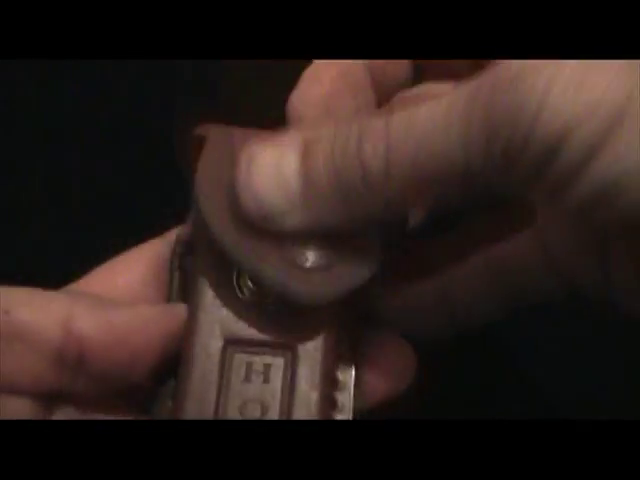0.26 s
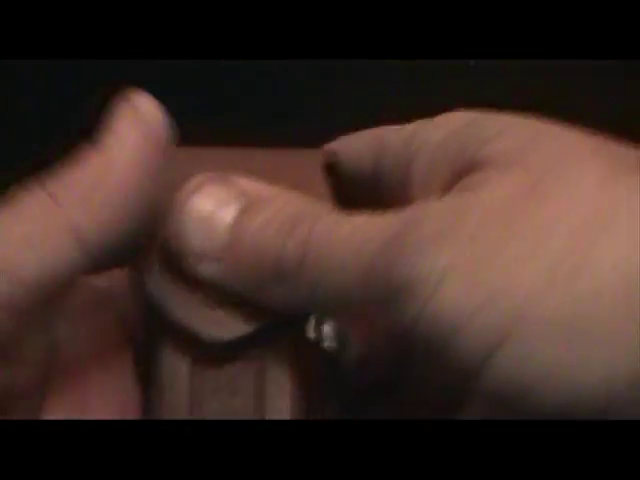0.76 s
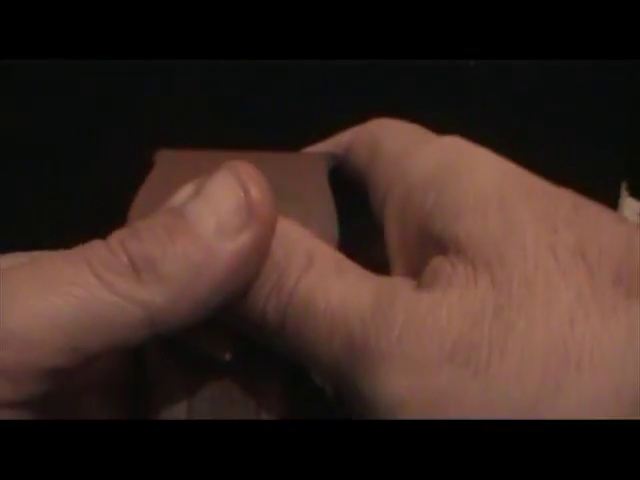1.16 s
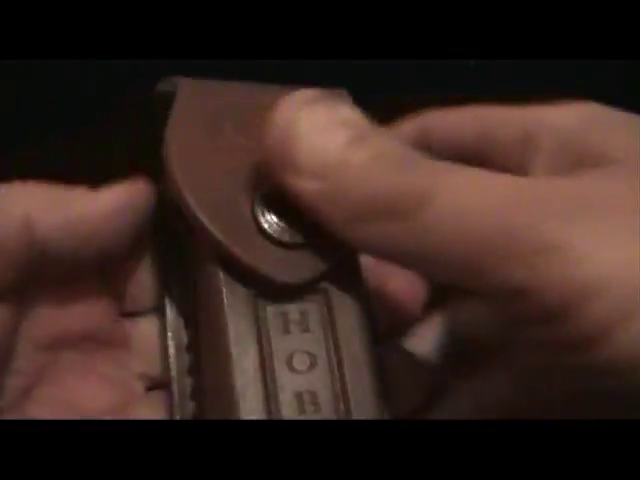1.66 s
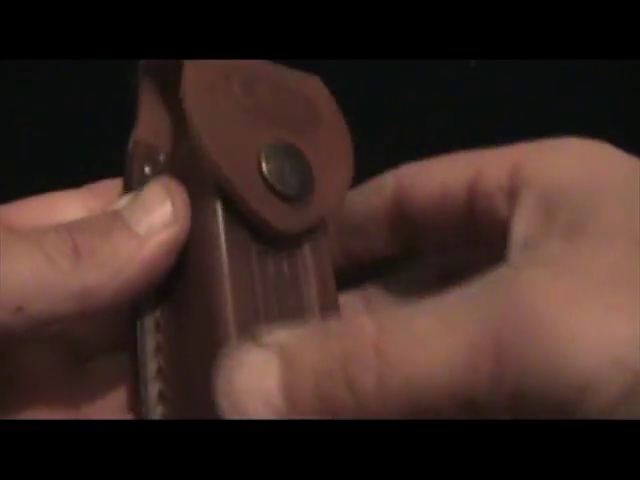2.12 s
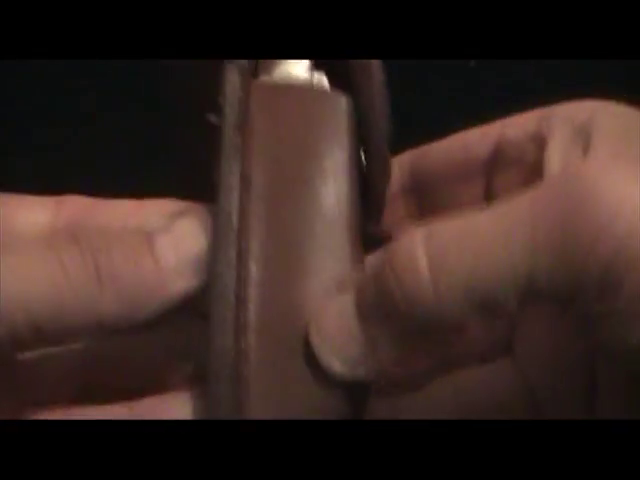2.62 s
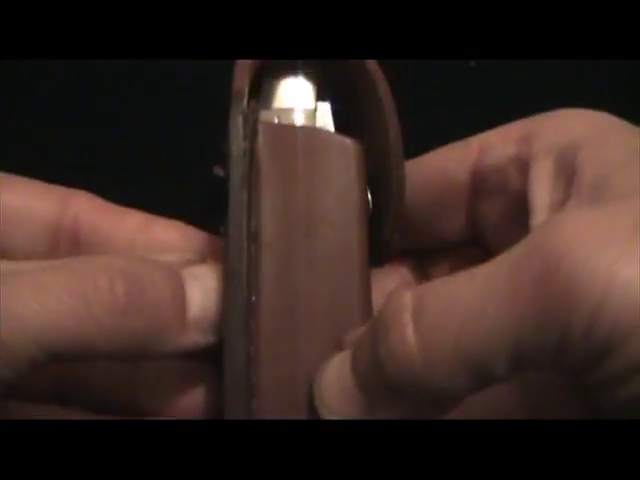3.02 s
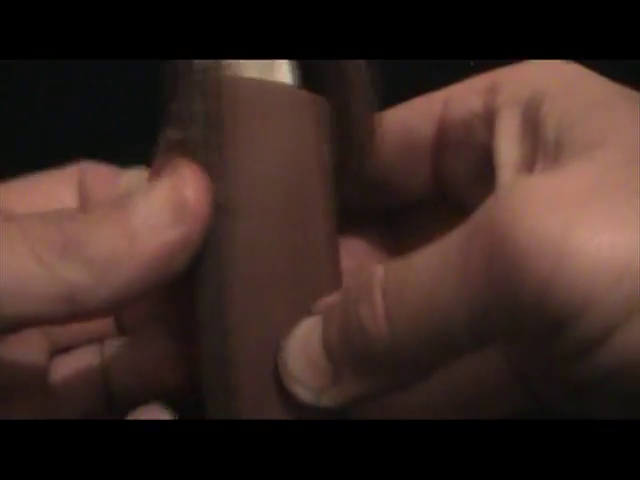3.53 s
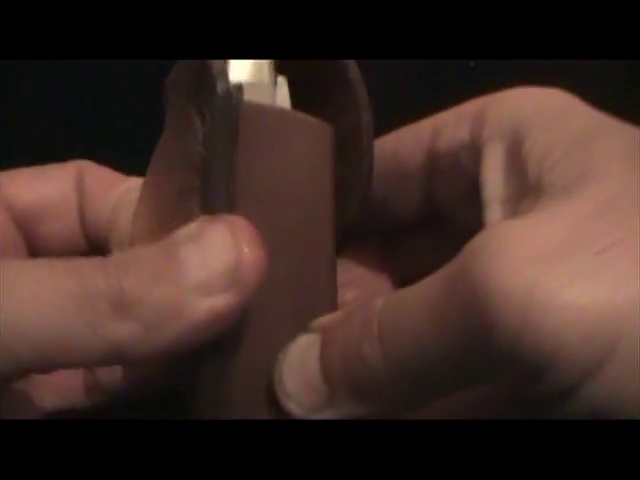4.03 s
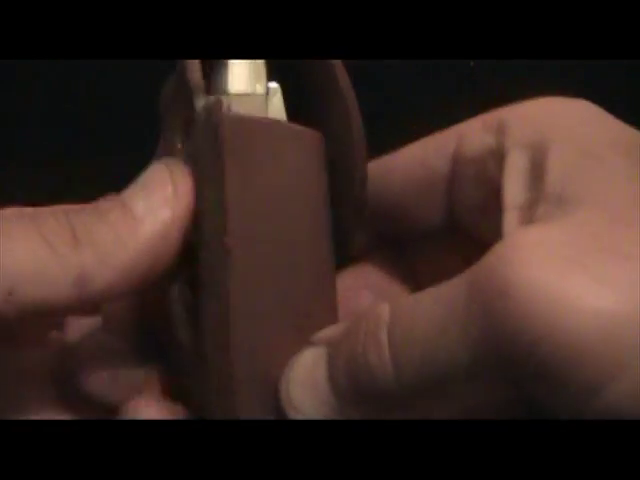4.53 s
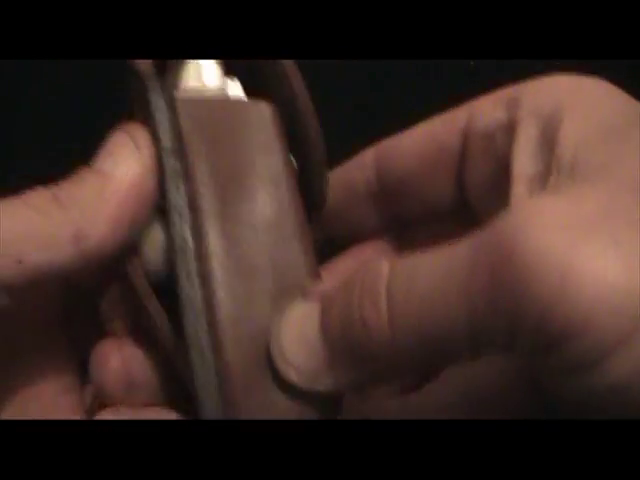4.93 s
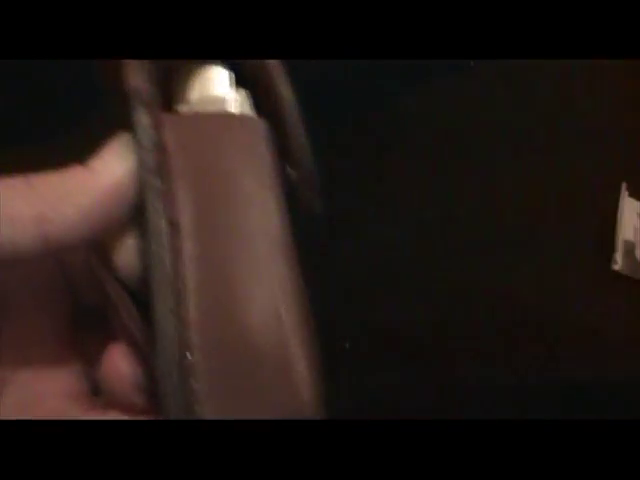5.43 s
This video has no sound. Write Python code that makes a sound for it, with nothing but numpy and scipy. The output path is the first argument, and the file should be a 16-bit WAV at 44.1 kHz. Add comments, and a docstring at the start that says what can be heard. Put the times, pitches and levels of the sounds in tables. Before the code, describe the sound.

Quiet, dry leather handling right at the microphones: light rustling and stud ticks, a short run of tight creaks, then a sudden overloaded snap just after one second. Afterwards come smooth rubbing strokes, scattered leather ticks and a dry crackle, growing busiest around four and a half seconds with muffled knocks, then fading into room tone, low hum and a thin high whine.

```python
"""Soft rubbing, clicks and creaks lead to the loud, overloaded snap of a press stud; then come strokes, ticks, knocks.
Hands fold the flap of a leather belt sheath over a steel utensil set, close to a camcorder in a quiet room.
Rubbing is dense random slips over filtered hiss; creaks, ticks, knocks and snap are damped sines with noise bursts.
A decaying-noise room echo, room tone, hum and whine surround them; soft clipping overloads the snap."""
import sys
import numpy as np
from scipy import signal
from scipy.fft import rfft, irfft
from scipy.io import wavfile
from scipy.ndimage import uniform_filter1d

SR = 44100
rng = np.random.default_rng(int(sys.argv[2]) if len(sys.argv) > 2 else 0)


def log_audio(samples):
    """Write samples as a 16-bit WAV file to the path given in sys.argv[1]."""
    # one column per channel
    frames = np.atleast_2d(samples).T
    # limit to full scale, then quantise
    limited = np.clip(frames, -1, 1)
    pcm = np.round(limited * 32767).astype(np.int16)
    wavfile.write(sys.argv[1], SR, pcm)


N = 249951

TIME = np.arange(N) / SR
AGE = TIME[:2048]  # time since the start of a short contact [s]
TOUCH_S = 0.008  # reference length of one contact [s]
BODY, RASP, HISS, THUMP = (600, 2800), (2800, 6500), (6500, 14500), (170, 600)  # ranges [Hz]
# colour of skin or steel sliding on leather: (frequency [Hz], level [dB])
SLIDE_COLOUR = [(60, -14), (200, -12), (500, -3.5), (800, -4.5), (1300, 5), (2100, 0), (2900, -9.5),
                (3900, -4), (4600, -5.5), (5400, -12.5), (6500, -14), (8500, -11.5), (11000, -27.5),
                (15000, -21)]


def undb(db):
    """Decibels to gain."""
    return 10 ** (np.asarray(db) / 20)


def level(x, db):
    """Set the rms level."""
    return x * undb(db) / np.sqrt(np.mean(x ** 2))


def touch_level(x, db):
    """Set the energy of a short sound, as its rms level over one brief contact."""
    return x * undb(db) / np.sqrt(np.sum(x ** 2) / (TOUCH_S * SR))


def band(x, edges, order=2):
    """Causal band-pass."""
    return signal.sosfilt(signal.butter(order, edges, "bandpass", fs=SR, output="sos"), x)


def colour(x, points):
    """Filter a sound by a curve through (frequency [Hz], level [dB]) points."""
    hz, db = np.transpose(points)
    f = np.maximum(np.fft.rfftfreq(len(x), 1 / SR), 1)
    curve_db = np.interp(np.log(f), np.log(np.maximum(hz, 1)), db)
    return irfft(rfft(x) * undb(curve_db), len(x))


def walk(rate):
    """Smooth random wander of rms 1, with a new target rate times a second."""
    hold = int(SR / rate)
    steps = np.repeat(rng.standard_normal(N // hold + 1), hold)
    return level(uniform_filter1d(steps, hold)[:N], 0)


def add(out, s, x):
    """Mix x in at time s."""
    i = int(s * SR)
    out[i:i + len(x)] += x[:N - i]


def fade(t60, t=AGE):
    """Exponential decay, 60 dB in t60 seconds."""
    return np.exp(-np.log(1000) * t / t60)


def ring(modes, t=AGE, length=1):
    """Damped modes of alternating sign, each building up as the blow spreads into the body."""
    out = 0
    for k, (hz, db, t60, rise) in enumerate(modes):
        envelope = fade(t60 * length, t) * (1 - np.exp(-t / rise))
        out = out + (-1) ** k * undb(db) * np.sin(2 * np.pi * hz * t) * envelope
    return out


def burst(edges, t60):
    """Crunch of a contact breaking up: band-passed noise with a quick rise and a short decay."""
    return band(rng.standard_normal(len(AGE)) * (fade(t60) - fade(t60 / 8)), edges, order=3)


def background(floor_db=-58, side_db=0, waver=0.2, flutter_db=2.5):
    """Steady room tone and recorder hiss, with a low hum and a thin, high whine whose pitch and level waver a
    little."""
    # room tone and hiss, common and opposed between channels: (frequency [Hz], relative level [dB])
    floor_mid = [(30, -14), (60, -9.5), (120, -0.5), (170, -3.5), (230, 3), (290, -3.5), (400, -7),
                 (700, -6.5), (1300, -9.5), (2500, -16), (4000, -17), (6000, -25), (8000, -26),
                 (14000, -32)]
    floor_side = [(30, -13), (60, -5), (130, -1.5), (200, -3), (400, -3.5), (700, -5.5), (1300, -9),
                  (2500, -13), (4000, -16), (8000, -25), (14000, -23)]
    # motor hum and line whine: (frequency [Hz], rms level [dB])
    hum_tones = [(213, -73), (1260, -80.5), (7865, -86), (15734, -72.5)]
    mid, side = (band(colour(rng.standard_normal(N), points), (20, 14300), order=8)
                 for points in (floor_mid, floor_side))
    hum = 0
    for hz, db in hum_tones:
        tone = np.sin(2 * np.pi * hz * TIME + waver * walk(25))
        hum = hum + level(tone * undb(flutter_db * walk(9.8)), db)
    opposed = level(side, floor_db + side_db) * np.array([[1], [-1]])
    return level(mid, floor_db) + hum + opposed


def turned(turn_s=2.68, turn_length_s=0.8):
    """Turning the sheath over in the hands, from 0 (flap under the fingers) to 1 (hollow wall)."""
    return np.clip((TIME - turn_s) / turn_length_s + 0.5, 0, 1)


def sliding(attack=0.27, release=0.44, grip_rasp_db=-9, grip_hiss_db=-16, grip_wander_db=0.5):
    """Sliding strength in the body, rasp and hiss ranges: strokes on top of the restless grip."""
    # finger strokes: (start [s], length [s], peak level [dB], rasp [dB re level], hiss [dB re level])
    strokes = [(0, 0.15, -68.5, 2.5, 0), (.178, .08, -57.5, 5, -11), (0.284, 0.064, -52, -1.5, -6.5),
               (0.323, 0.1, -53.5, -15, -12), (0.448, 0.035, -62, -22, -21), (0.576, .1, -66.5, 3, 3.5),
               (0.646, 0.079, -48.5, -10.5, -19), (0.777, 0.027, -50, -15, -14),
               (0.867, 0.078, -60, -12, -3), (1.05, 0.25, -58.5, -9, -18), (1.459, 0.082, -57, -6.5, 1),
               (1.534, 0.081, -58, -1.5, -5), (1.677, .09, -52, -9.5, -8), (1.858, 0.1, -48, -9, -8),
               (1.993, 0.1, -49.5, -10, -14.5), (2.094, 0.11, -53, -10, -14.5),
               (2.229, 0.037, -57.5, -9.5, -14), (2.36, 0.074, -57, -4, -6.5),
               (2.411, 0.084, -48, -10.5, -13.5), (2.462, 0.26, -51.5, -9, -15.5),
               (2.799, 0.05, -62, 1, -15.5), (2.891, 0.046, -47, -7.5, -19), (2.93, .07, -67, -3, -22),
               (3.016, 0.02, -59, 4.5, -1.5), (3.23, 0.16, -52.5, -4.5, -13.5),
               (3.367, 0.024, -46, -13, -28), (3.495, 0.096, -44.5, -3.5, -14),
               (3.534, 0.041, -41.5, -3, -4.5), (3.624, 0.13, -53, -4.5, -12),
               (3.753, 0.045, -53, -6, -6.5), (3.839, 0.099, -57, -7.5, -17.5),
               (3.959, 0.093, -57.5, -8.5, -16.5), (4.055, 0.079, -49.5, -6.5, -14),
               (4.238, 0.061, -45.5, -4.5, -18.5), (4.338, 0.05, -48.5, -8, -16.5),
               (4.393, 0.088, -42, -10.5, -14.5), (4.458, 0.037, -40.5, -11, -6.5),
               (4.54, 0.095, -52, -7, -11.5), (4.641, .05, -50, -12, -16), (4.694, 0.092, -54, -13, -18),
               (4.82, 0.1, -52.5, -15, -21), (5.059, 0.031, -52, -15, -9),
               (5.185, 0.054, -53.5, -3.5, -11.5), (5.585, 0.2, -63.5, 1, -5.5)]
    # the gripping hands keep shifting a little between strokes: (time [s], level [dB])
    grip_points = [(0, -69.5), (.55, -60), (1.0, -62.5), (1.4, -66), (2.3, -67.5), (2.75, -79), (3.2, -61),
                   (3.5, -60), (3.82, -63), (4.5, -62), (5.17, -63), (5.26, -75.5), (5.67, -73)]
    grip = undb(np.interp(TIME, *np.transpose(grip_points)) + grip_wander_db * walk(12))
    power = (undb([[0], [grip_rasp_db], [grip_hiss_db]]) * grip) ** 2
    for s, length, db, rasp, hiss in strokes:
        # a stroke gathers speed, glides and eases off; attack and release are shares of its length
        along = np.linspace(0, 1, int(length * SR))
        speed = np.clip(np.minimum(along / attack, (1 - along) / release), 0, 1)
        for part, part_db in zip(power, (0, rasp, hiss)):
            add(part, s, (undb(db + part_db) * speed) ** 2)
    return np.sqrt(power)


def rubbing(slide, grain_db=2.5, grains_per_s=1100, smooth_db=-5, stutter_db=2.0, hiss_grain_db=-9,
            body_db=-3, rasp_db=0, hiss_db=-1, sheen_db=-7):
    """Skin catches on the grain of the leather in dense tiny slips, over a smooth hiss that rules the treble."""
    sizes = undb(grain_db * np.minimum(rng.exponential(size=N), 4))
    hits = (rng.random(N) < grains_per_s / SR) * rng.choice([-1, 1], N)
    grains = level(hits * sizes * undb(stutter_db * walk(130)), 0)
    smooth = rng.standard_normal(N)
    gritty = colour(grains + undb(smooth_db) * smooth, SLIDE_COLOUR)
    silky = colour(undb(hiss_grain_db) * grains + smooth, SLIDE_COLOUR)
    parts = [(gritty, (60, BODY[1]), body_db), (gritty + silky, RASP, rasp_db), (silky, HISS, hiss_db)]
    friction = sum(gain * level(band(x, edges, order=4), db) for gain, (x, edges, db) in zip(slide, parts))

    def resonance(hz, width, db):
        """The same slips, with new random signs, ring the leather under the fingers."""
        return level(band(grains * rng.choice([-1, 1], N), (hz - width / 2, hz + width / 2)), db)

    flap = resonance(2300, 690, -7.5)
    wall = resonance(1310, 420, -3)
    # the polished flap adds a high sheen to the hiss
    sheen = level(band(smooth, (8500, 13800), order=6), sheen_db)
    over = turned()
    return friction + (1 - over) * (slide[0] * flap + slide[2] * sheen) + over * slide[0] * wall


def crackle(slide, per_s=50, gain_db=-2, wall_db=3, limit_db=-54, spread_db=3, hz=1350, t60=0.005, grit_db=-4):
    """Leather lets go in faint, dry random creaks that follow the pressure to a limit; the wall creaks most."""
    pressure = np.minimum(slide, undb(limit_db)) * undb(wall_db * turned())
    out = np.zeros(N)
    for when, size, place in rng.random((int(per_s * N / SR), 3)):
        pitch = hz * np.exp(0.3 * (place - 0.5))
        tone = touch_level(ring([(pitch, 0, t60, t60 / 10)]), 0)
        wall = tone + touch_level(burst(BODY, t60), grit_db)
        loudness_db = gain_db + spread_db * (2 * size - 1)
        add(out, when * TIME[-1], pressure[int(when * N)] * touch_level(wall, loudness_db))
    return out


def echo(x, wet_db=-22, gap_s=0.0064, build_s=0.011):
    """A small furnished room: the walls answer after a gap, the echoes thicken, and the top band dies first."""
    # bands of the echo: (centre [Hz], relative level [dB], t60 [s])
    room_bands = [(247.2, -7, .35), (494, -3.5, 0.21), (940, 4.5, 0.22), (2000, -3, .33), (3940, 0.5, .28),
                  (7870, -3.5, 0.2), (15000, -13, .14)]
    t = TIME[:SR // 2]
    tail = 0
    for hz, db, t60 in room_bands:
        edges = hz / np.sqrt(2), min(hz * np.sqrt(2), HISS[1])
        tail = tail + undb(db) * band(rng.standard_normal(len(t)), edges, order=3) * fade(t60, t)
    tail = tail * (1 - np.exp(-np.maximum(t - gap_s, 0) / build_s))
    return signal.fftconvolve(x, undb(wet_db) * tail / np.sqrt(np.sum(tail ** 2)))[:N]


def slips(rows, ring_t60, grit_db, grit_t60, edge_t60, edge_db, thump_hz, thump_t60):
    """Each slip rings the damped leather, plucks the stiff seam, tears at fibres and thumps the pocket.

    rows: (time [s], level [dB], ring [Hz], rasp [dB], hiss [dB], thump [dB re level]); rasp and hiss are re
    level before the edge_db trim."""
    # modes of the hollow pocket: (multiple of the thump pitch, relative level [dB])
    pocket_modes = [(1, 0), (1.5, -3), (2.1, -1)]
    out = np.zeros(N)
    for s, db, hz, rasp, hiss, low in rows:
        wall = touch_level(ring([(hz, 0, ring_t60, ring_t60 / 10)]), 0)
        body = touch_level(wall + touch_level(burst(BODY, grit_t60), grit_db), 0)
        seam = ring([(f * rng.uniform(0.97, 1.03), 0, edge_t60, edge_t60 / 10) for f in (3300, 5300)])
        edge = touch_level(touch_level(burst(RASP, edge_t60), 0) + touch_level(seam, 0), rasp)
        fibres = touch_level(burst((HISS[0], 11000), edge_t60), hiss)
        hollow = 0
        for k, (multiple, mode_db) in enumerate(pocket_modes):
            hollow = hollow + (-1) ** k * undb(mode_db) * np.sin(2 * np.pi * multiple * thump_hz * AGE)
        pocket = touch_level(band(hollow * fade(thump_t60), THUMP), low)
        add(out, s, undb(db) * (body + undb(edge_db) * (edge + fibres) + pocket))
    return out


def small_contacts(ring_t60=0.006, tick_hiss_db=-13.5, tick_thump_db=-18.5):
    """Ringing ticks, dry cracks and bright clicks all sound through the same leather body."""
    # light touches of the stud's cap: (time [s], level [dB])
    click_rows = [(0.3149, -45.5), (0.4018, -42.5), (.4152, -46.5), (.6615, -51), (1.472, -53)]
    # the squeezed leather, flap or wall, lets go with a short ring: (time [s], level [dB], ring [Hz], rasp [dB
    # before edge trim])
    tick_rows = [(.687, -47.5, 1160, -5), (.8, -52.5, 2360, -16), (.83, -48, 2280, -18),
                 (1.8435, -54, 1360, -2.5), (2.4541, -42, 1170, -20), (2.4602, -41, 1900, -5.5),
                 (2.652, -53.5, 1177, -7), (2.6892, -54.5, 2200, 6), (2.9066, -37.5, 1300, -16),
                 (2.9476, -47, 1774, -2), (3.333, -42, 1600, -20), (3.3376, -46.5, 1210, -10),
                 (3.371, -44.5, 1200, -3), (3.3806, -47, 1160, -4), (3.4478, -45.5, 1360, 4),
                 (3.5137, -45, 1160, 0.5), (3.6239, -38, 1325, -18), (3.92, -50.5, 1210, 1.5),
                 (3.9462, -44.5, 1220, -3), (3.9645, -47.5, 1230, 4), (4.064, -44.5, 1022, -19),
                 (4.2493, -43, 1180, -2.5), (4.2738, -35, 1350, -5.5), (4.3924, -46, 1230, -2.5),
                 (4.4144, -41.5, 2150, -9), (4.4711, -33.5, 1350, -23), (4.485, -36.5, 1280, -16),
                 (4.5155, -43, 1460, -5), (4.5494, -44, 1450, -6), (4.564, -40.5, 1510, -7.5),
                 (4.6038, -42, 1500, -25), (4.6224, -44, 1280, -7), (4.6565, -41.5, 1450, -6.5),
                 (4.6979, -45, 1050, -4), (4.9521, -46, 1530, -18), (4.9772, -46.5, 1350, -3.5),
                 (4.99, -46.5, 1350, -8), (5.0042, -50, 1270, -7), (5.078, -52, 1250, -7),
                 (5.087, -43, 1490, -8.5)]
    # stiff leather cracks drily as it bends, with a hollow thump: (time [s], level [dB])
    crack_rows = [(0.8947, -51), (.948, -50.5), (2.906, -48), (2.9964, -52), (3.0275, -51.5), (3.08, -49),
                  (3.1089, -49.5), (3.1265, -49), (3.1464, -41.5)]
    # added to each row: ring [Hz], then rasp, hiss and thump [dB]
    clicks = [(s, db, 1250, 4, 3, -7.5) for s, db in click_rows]
    cracks = [(s, db, 852, -2, -25, -0.5) for s, db in crack_rows]
    ticks = [(s, db, hz, rasp, rasp + tick_hiss_db, tick_thump_db) for s, db, hz, rasp in tick_rows]
    ringing = slips(ticks, ring_t60, grit_db=-7.5, grit_t60=0.0081, edge_t60=0.0066, edge_db=-5.5,
                    thump_hz=296.0, thump_t60=0.0059)
    dry = slips(cracks + clicks, ring_t60, grit_db=4, grit_t60=0.007, edge_t60=0.0055, edge_db=-4.5,
                thump_hz=250, thump_t60=0.007)
    return ringing + dry


def knocks():
    """Steel utensils knock dully in their pocket, each with a brief scrape that peaks just ahead of the knock."""
    # (time [s], level [dB], ring [Hz], rasp [dB before edge trim], hiss [dB before edge trim],
    #  thump [dB re level], thump [Hz], ring t60 [s], scrape [dB re level], scrape rise and fall constant [s])
    knock_rows = [(0.419, -35.5, 1180, -19, 1, -21, 240, 0.014, 0.5, 0.0025),
                  (4.3592, -24, 1340, -24, -30, -31, 268, 0.0097, -41, 0.0024),
                  (4.4407, -22.5, 1035, -42, -43, -7.5, 315, 0.01, -17, 0.0014),
                  (4.886, -27.5, 1370, -11, -8, -9.5, 250, 0.015, -3, 0.0036)]
    out = np.zeros(N)
    middle = AGE[-1] / 2
    for s, db, hz, rasp, hiss, low, pocket_hz, t60, scrape_db, length in knock_rows:
        out += slips([(s, db, hz, rasp, hiss, low)], ring_t60=t60, grit_db=-8, grit_t60=0.011,
                     edge_t60=0.007, edge_db=-4.5, thump_hz=pocket_hz, thump_t60=0.025)
        swell = np.exp(-np.abs(AGE - middle) / length)
        scrape = colour(rng.standard_normal(len(AGE)), SLIDE_COLOUR) * swell
        add(out, s - middle - 0.002, touch_level(scrape, db + scrape_db))
    return out


def creak(fibre_db=-17, fibre_t60=0.0066, follow_db=-7, follow_s=0.001, colour_scatter_db=2,
          jitter_s=0.0004, scatter_db=1):
    """Stick and slip: each jerk rings the flap, and a smaller one follows at once."""
    # runs of nearly even jerks under the thumbs, before and after the stud gives:
    # (first jerk [s], last jerk [s], approximate gap [s], mean level [dB], brightness [dB per octave])
    creak_runs = [(1.0946, 1.1046, 0.0041, -44.5, -1.5), (1.1152, 1.1449, .0142, -44, 1.5),
                  (1.168, 1.2089, 0.016, -41.5, -0.5), (1.246, 1.2966, .01, -40, 0),
                  (1.302, 1.3252, .007, -42.5, -3), (1.333, 1.3435, .011, -42, -4)]
    # modes of the leather flap: (frequency [Hz], relative level [dB], t60 [s], build-up [s])
    flap_modes = [(296.3, -21.5, 0.0057, .0004), (850, -2, 0.0076, 0.00057), (1200, -7, 0.0084, 0.00019),
                  (1540, 4.5, 0.0043, 0.00041), (2040, -4.5, .005, 0.00009), (2420, -3, 0.0057, .0003),
                  (3140, -13.5, 0.0026, 0.00033), (3870, -17, 0.0048, 0.000293),
                  (5590, -17.5, 0.0036, .0003)]
    out = np.zeros(N)
    for first, last, gap, run_db, bright in creak_runs:
        for even_s in np.linspace(first, last, round((last - first) / gap) + 1):
            s = even_s + jitter_s * rng.standard_normal()
            db = run_db + scatter_db * rng.standard_normal()
            modes = []
            for hz, mode_db, t60, rise in flap_modes:
                tilt_db = bright * np.log2(hz / 1500)
                modes.append((hz, mode_db + tilt_db + colour_scatter_db * rng.standard_normal(), t60, rise))
            jerk = touch_level(ring(modes), db)
            fibres = touch_level(burst((RASP[0], 9000), fibre_t60), db + fibre_db + bright)
            add(out, s, jerk + fibres)
            add(out, s + follow_s * rng.uniform(0.28, 2.3), undb(follow_db) * jerk)
    return out


def snap(blows, crack_t60=0.007):
    """Two blows of the press stud, each a crack and a short ring; the last one sets the steel ringing."""
    # stud on its leather backing: (frequency [Hz], level [dB re blow], t60 before blow's share [s], build-up [s])
    stud_modes = [(44.85, -28, 0.039, 0.0016), (128, -21, 0.016, 0.003), (260, -24.5, 0.022, 0.00031),
                  (416, -24.5, 0.0089, 0.00059), (607, -15.5, 0.014, 0.001), (860, -5, .010, 0.001),
                  (1010, 2, 0.0061, 0.00047), (1280, -0.5, 0.013, .0012), (1640, -2.5, 0.012, 0.00056),
                  (1996, -4, 0.0099, 0.0004), (2382, 9, 0.0071, .0006), (3700, -8, 0.0069, 0.000067),
                  (4537, -5, 0.0089, .0002), (5680, -12.5, 0.01, 0.0001), (7810, -7.5, 0.007, 0.00011),
                  (8290, -10.5, 0.009, .0001), (8760, 3.5, 0.0043, 0.00011), (11500, -16, 0.0074, 0.000051)]
    # the utensils ring on faintly: (frequency [Hz], level [dB], t60 [s], build-up [s])
    steel_modes = [(2114, -53, 0.95, .001), (3324, -43.5, 0.27, .001), (5400, -46, 0.2, 0.00091),
                   (7860, -58.5, .4, .001)]
    out = np.zeros(N)
    for s, db, crack_db, length in blows:
        crack = undb(crack_db) * burst((BODY[0], HISS[1]), crack_t60 * length)
        add(out, s, undb(db) * (ring(stud_modes, length=length) + crack))
    add(out, blows[-1][0], ring(steel_modes, TIME[:SR]))
    return out


def bumps(hz=70, t60=0.035):
    """Flesh meets leather with a low, dead thud."""
    # soft bumps of the hands against the sheath: (time [s], level [dB])
    bump_rows = [(1.471, -55), (2.906, -55), (3.553, -53), (3.879, -60), (4.481, -46), (4.885, -48.5)]
    out = np.zeros(N)
    for s, db in bump_rows:
        add(out, s, touch_level(ring([(hz, 0, t60, t60 / 20)]), db))
    return out


def scene(echo_side_db=-5, clap_db=18, port_lag=0.3):
    """All the handling happens just in front of two closely spaced microphone ports."""
    # the stud's spring rides over the rim, then the cap slams home:
    # (time [s], level [dB], crack [dB re level], ring length [share of t60])
    blows = [(1.2213, -7.5, 3, 0.93), (1.2255, 3.5, 0.5, 0.95)]
    slide = sliding()
    leather = rubbing(slide) + crackle(slide[0]) + small_contacts() + knocks() + creak() + bumps()
    near = leather + snap(blows)
    # summed over all directions the snap reaches the walls as one broad clap, here a single impulse
    radiated = leather.copy()
    add(radiated, blows[-1][0], undb([clap_db]))
    # each port leads or lags by about port_lag samples, which widens mainly the treble
    side = port_lag * np.gradient(near) + undb(echo_side_db) * echo(radiated)
    return near + echo(radiated) + side * np.array([[1], [-1]]) + background()


def record(dry, ceiling=0.98, left_bias=0.079, right_bias=-0.13, top_hz=16100):
    """The snap clips the input stage, a little off centre in each channel; the top is cut."""
    bias = np.array([[left_bias], [right_bias]])
    driven = dry + bias
    clipped = driven / (1 + (driven / ceiling) ** 6) ** (1 / 6) - bias
    return signal.sosfilt(signal.ellip(8, 0.2, 60, top_hz, fs=SR, output="sos"), clipped)


dry = scene()
out = record(dry)
log_audio(out)
```